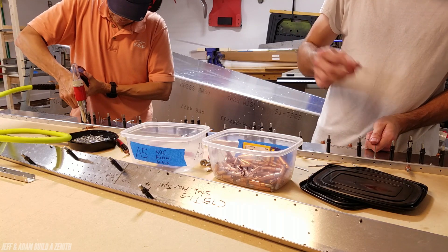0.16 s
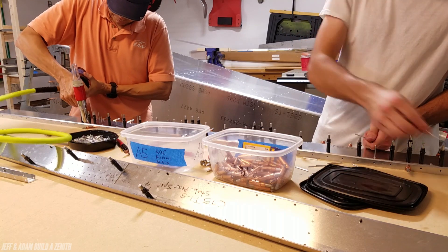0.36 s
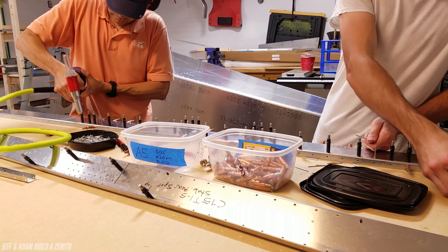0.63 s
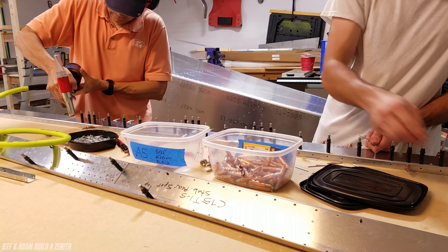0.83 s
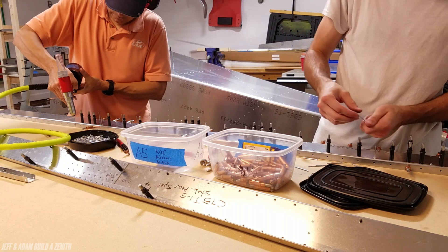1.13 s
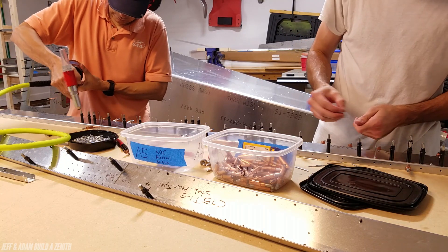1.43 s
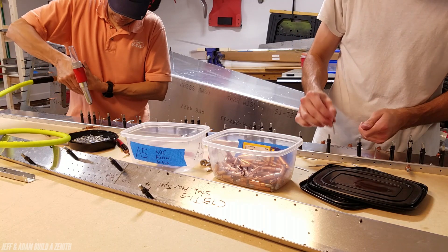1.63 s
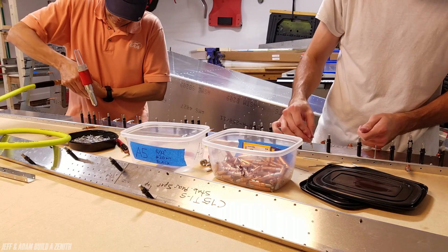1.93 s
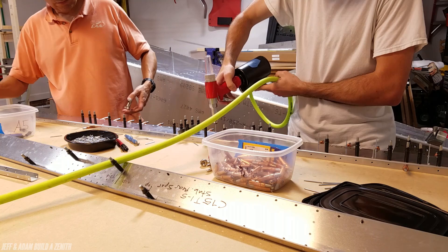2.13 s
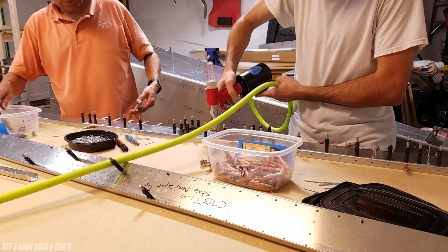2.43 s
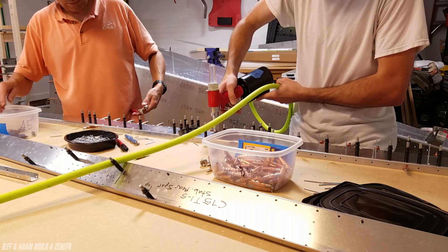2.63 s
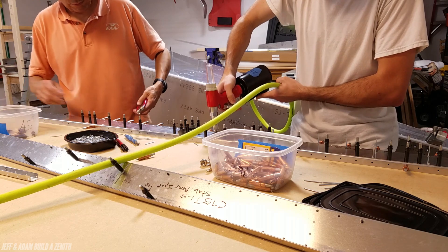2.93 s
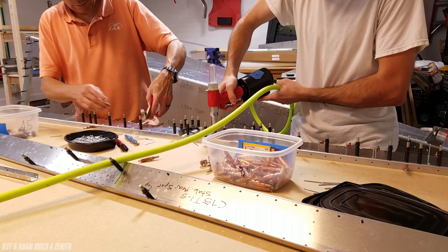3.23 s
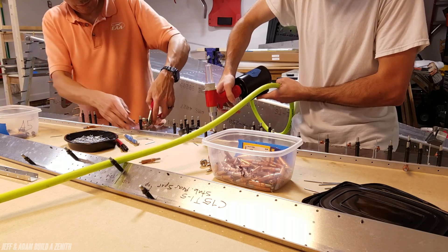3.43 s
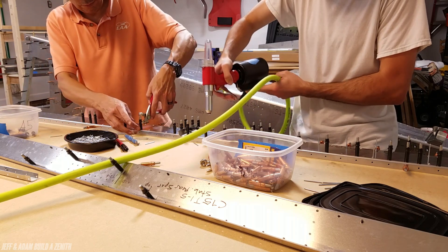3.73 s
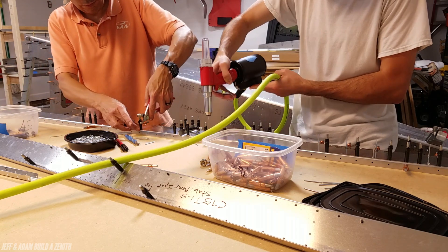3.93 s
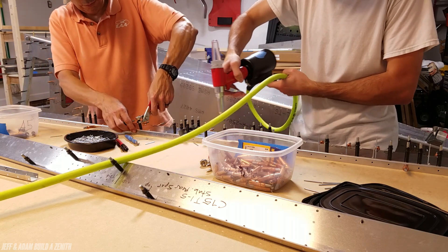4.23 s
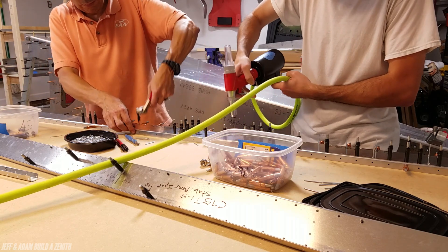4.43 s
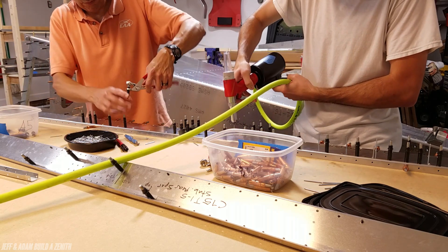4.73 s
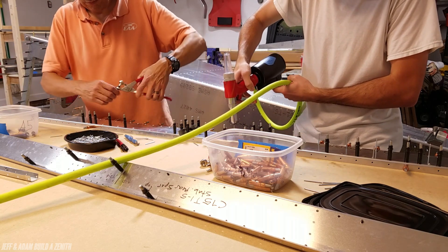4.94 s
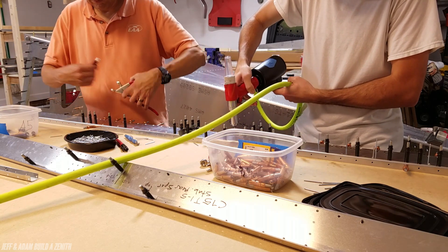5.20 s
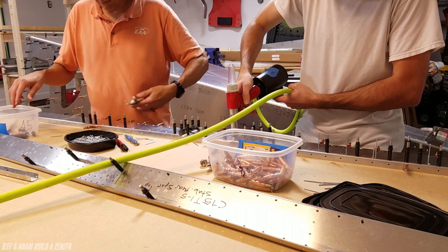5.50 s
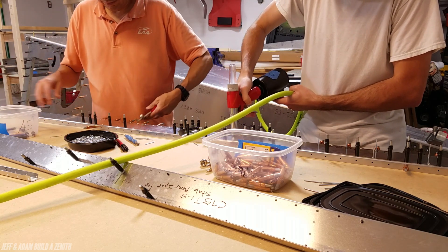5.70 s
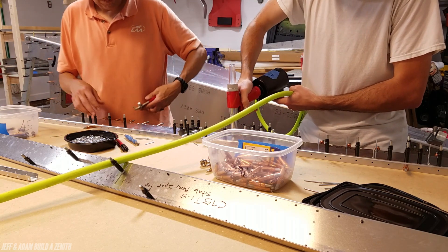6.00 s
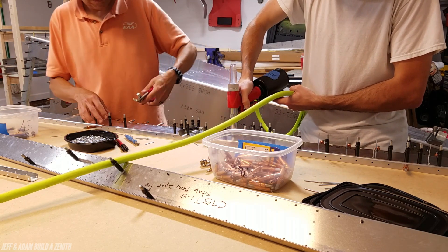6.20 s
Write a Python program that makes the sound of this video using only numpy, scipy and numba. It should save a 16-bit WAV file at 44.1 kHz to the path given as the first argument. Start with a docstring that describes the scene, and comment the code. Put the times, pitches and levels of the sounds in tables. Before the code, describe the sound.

Close, nearly mono workshop sound over a soft fan drone. Three rivets are set about three seconds apart, each with a dull piston thump, a loud crack ringing thin sheet metal, and a bright burst of escaping air. Between them hands click pliers, set down tools, drag things briefly and chink loose fasteners; the hardest clatter comes just before the second shot. Walls add a short reverberant tail.

```python
"""In a hard-walled workshop a fan hums while air-powered rivet guns set three blind rivets on a bench. Hands
set down and drag tools and fasteners: decaying rings with noisy rattles, rubbing noise, chinks. A brief faint
burst of treble sounds near 2.12 s. Each shot: the piston thuds and air rushes in, the mandrel snaps and rings
the sheet metal as a crowd of modes, the exhaust blows down as shaped noise, and the suction ends in a breathy
whistle. One microphone hears it with the walls' tail; gain control ducks a little under the loudest blows."""
import sys
import numpy as np
from scipy import signal
from scipy.fft import rfft, irfft
from scipy.io import wavfile
from scipy.ndimage import uniform_filter1d
from numba import njit

SR = 44100
rng = np.random.default_rng(int(sys.argv[2]) if len(sys.argv) > 2 else 0)


def how_loud(loudness_db):
    """Turn decibels into a plain amplitude multiplier (0 dB gives 1, 20 dB gives 10)."""
    steps = np.asarray(loudness_db, float) / 20
    return 10 ** steps


def waveform_to_disk(signal):
    """Save audio, clipped to [-1, 1], as 16-bit WAV at the path in sys.argv[1]."""
    frames = np.transpose(np.atleast_2d(signal))
    scaled = np.clip(frames, -1, 1) * 32767
    samples = np.round(scaled).astype(np.int16)
    wavfile.write(sys.argv[1], SR, samples)


N = 280474
TIME = np.arange(N) / SR  # seconds

# spectrum of bright metallic jingling: freq_hz, relative density_db (per Hz)
BRIGHT_METAL = [(5000, -36), (9000, -29), (11000, -17.5), (13000, -11), (15700, -12.5)]
# spectrum of things rattling or rubbing on the bench: freq_hz, relative density_db (per Hz)
BENCH_RATTLE = [(30, -1), (90, 4), (250, 3.5), (750, 6.5), (1400, 2.5), (3000, -9.5), (5000, -21.5),
                (8000, -38)]


def colour(x, points):
    """Filter by (Hz, dB) points joined on a log axis, without looking ahead (minimum phase)."""
    hz, db = np.transpose(points)
    grid_hz = np.maximum(np.fft.rfftfreq(4096, 1 / SR), 1)
    level_db = np.interp(np.log(grid_hz), np.log(hz), np.maximum(db, -80))
    cepstrum = irfft(level_db * np.log(10) / 20)
    # folding the cepstrum forward makes the response causal
    cepstrum[1:2048] *= 2
    cepstrum[2049:] = 0
    response = irfft(np.exp(rfft(cepstrum)))
    return signal.fftconvolve(x, response)[:len(x)]


def hiss(points):
    """Coloured noise of rms 1."""
    x = colour(rng.standard_normal(N), points)
    return x / x.std()


def walk(rate, size=N):
    """Random levels held 1 / rate s and slewed twice; spread near 1."""
    k = int(SR / rate)
    held = np.repeat(rng.standard_normal(size // k + 1), k)
    return 1.3 * uniform_filter1d(uniform_filter1d(held, k), k)[:size]


def swell(start, rise_s, fall_db):
    """Envelope: silent, a quick rise, then a fall of fall_db a second."""
    t = np.maximum(TIME - start, 0)
    return (1 - np.exp(-t / rise_s)) * how_loud(-fall_db * t)


def add(out, start, x):
    """Mix x in at start seconds."""
    i = int(start * SR)
    out[..., i:i + x.shape[-1]] += x[..., :N - i]


def peak(x):
    """Scale the loudest few milliseconds to a peak near 1, judged by their mean power."""
    return x / np.sqrt(2 * np.max(uniform_filter1d(x ** 2, size=130)))


def shop():
    """Fan noise that drifts a little, under tones that waver in pitch and level."""
    # fan noise spectrum: freq_hz, relative density_db (per Hz)
    fan_spectrum = [(25, -4), (65, 7), (100, -4.5), (130, -6), (200, 4.5), (400, -2.5), (700, -2.5),
                    (1400, -4.5), (2200, -8), (3500, -17), (5500, -28.5), (8000, -45), (12500, -48),
                    (16000, -45)]
    # fan tones: freq_hz, mean level_db, slow waver_db
    fan_tones = [(196.3, -42, .8), (262, -57, 2), (526, -56, 3.5), (788, -61, 3)]
    out = how_loud(-42 + .6 * walk(2)) * hiss(fan_spectrum)
    for hz, db, waver_db in fan_tones:
        phase = 2 * np.pi * np.cumsum(hz * (1 + 0.00314 * walk(2.5))) / SR
        level = how_loud(db + waver_db * walk(3) + 1.2 * walk(25))
        out = out + level * np.sqrt(2) * np.sin(phase)
    return out


def room(x):
    """Diffuse tail of the walls: octave bands of noise, each with its own decay."""
    # decay of the hard-walled shop: freq_hz, t60_s
    wall_decay = [(100, 0.77), (500, 0.76), (2000, 1), (6000, 0.81), (14000, 0.11)]
    t = np.arange(SR) / SR
    hz, t60 = np.transpose(wall_decay)
    tail = 0
    for centre in 62.5 * 2 ** np.arange(9):
        edges_hz = [centre / 2 ** .5, min(centre * 2 ** .5, .45 * SR)]
        band = signal.butter(2, edges_hz, "bandpass", fs=SR, output="sos")
        decay_s = np.interp(np.log(centre), np.log(hz), t60)
        tail = tail + signal.sosfilt(band, rng.standard_normal(SR)) * how_loud(-60 * t / decay_s)
    tail = tail * (1 - np.exp(-t / 0.0026))  # the tail builds up over a few ms
    return signal.fftconvolve(x, tail / np.sqrt(np.sum(tail ** 2)))[:N]


def scrapes():
    """Things dragged or shifted on the bench: unsteady rubbing noise with a trace of bright hiss."""
    # drags: start_s, nominal level_db, length_ms
    drags = [(2.47, -29.5, 78), (3.64, -30.5, 31), (3.664, -30.5, 66), (3.79, -32.5, 64),
             (5.298, -34.5, 54), (5.36, -36, 83), (5.455, -24.5, 33), (5.625, -38, 55), (5.69, -30, 76)]
    rub = hiss(BENCH_RATTLE) * how_loud(0.87 * walk(120)) + how_loud(-22.5) * hiss(BRIGHT_METAL)
    out = np.zeros(N)
    for start, db, length_ms in drags:
        progress = np.clip((TIME - start) * 1000 / length_ms, 0, 1)
        out += how_loud(db) * np.sin(np.pi * progress ** 0.48) * rub
    return out


def loose_pin():
    """A loose pin sings on thinly after a hard knock: one high sine, unsteady in pitch."""
    seconds = np.cumsum(1 + 0.0037 * walk(150)) / SR
    return how_loud(-52) * np.sin(2 * np.pi * 12080 * seconds) * swell(2.39, .01, 130)


def chink(db):
    """A burst of bright noise: a tick, then a fainter shimmer that dies more slowly."""
    tick_s, shimmer_s, shimmer_db = 0.0013, 0.055, -15.5
    t = np.arange(int(.2 * SR)) / SR
    tick = np.exp(-t / tick_s)
    shimmer = how_loud(shimmer_db) * np.exp(-t / shimmer_s) * (1 - tick)
    noise = rng.standard_normal(len(t))
    return how_loud(db) * peak(colour(noise * (tick + shimmer), BRIGHT_METAL))


def chinks():
    """Short bright metallic chinks from the bench, and a brief faint burst of treble near 2.12 s; all are
    bursts of bright noise."""
    # bright bursts: start_s, peak_db
    bursts = [(1.338, -41), (1.3459, -44), (2.1191, -44), (2.3136, -50), (2.382, -52), (2.4079, -34),
              (2.434, -28.5), (2.7107, -55), (3.0026, -52.5), (4.0796, -54), (4.0916, -49), (4.1834, -54),
              (4.2373, -51), (4.3505, -38), (4.8035, -45.5), (5.3103, -53), (5.4011, -54), (5.447, -33),
              (5.4595, -29), (5.6291, -40), (5.6634, -40), (5.676, -33)]
    out = np.zeros(N)
    for start, db in bursts:
        add(out, start, chink(db))
    return out


def tap(db, hz, rattle_ms, thump_db, cycles, struck):
    """One contact: a few cycles of the struck thing and a broad rattle, as two rows."""
    t = np.arange(int(.2 * SR)) / SR
    turns = hz * t
    ring = np.sin(2 * np.pi * turns) * turns / cycles * np.exp(1 - turns / cycles)
    shape = np.exp(-t * 1000 / rattle_ms) * (1 - np.exp(-t * 3000 / rattle_ms))
    rattle = colour(rng.standard_normal(len(t)) * shape, struck)
    return how_loud(db) * np.array([peak(ring), how_loud(thump_db) * peak(rattle)])


def clicks():
    """Small close metal clicks of pliers and clamps: short high taps."""
    # clicks: start_s, peak_db, ring_hz, rattle_db (against ring)
    click_rows = [(1.05, -28, 3580, 0), (1.14, -29, 2500, -2), (1.1435, -32, 2430, 4),
                  (1.3367, -27, 2510, 3), (1.4068, -32, 2450, 3), (1.4463, -36, 2400, 3),
                  (2.3985, -11, 2230, -21), (2.4363, -14.5, 2830, -8), (3.854, -23.5, 2880, -6),
                  (3.965, -18, 2080, 1), (4.08, -27, 2850, 8), (4.092, -28.5, 2550, 7),
                  (4.104, -31, 2330, -1), (4.186, -29.5, 2520, 9), (4.237, -33.5, 2720, 4),
                  (4.358, -22, 2660, 0)]
    # rattle of small metal: freq_hz, relative density_db (per Hz)
    small_metal = [(400, -26), (1500, 9), (2200, 14), (4200, -2), (6000, -23), (9000, -48)]
    out = np.zeros(N)
    for start, db, hz, thump_db in click_rows:
        contact = tap(0, hz, rattle_ms=1.6, thump_db=thump_db, cycles=2.66, struck=small_metal)
        add(out, start, how_loud(db) * peak(contact.sum(axis=0)))
    return out


def knocks():
    """Tools and tubs set down: three contacts each, unevenly spaced, as rows of rings and rattles."""
    # knocks: start_s, ring peak_db, ring_hz, bounce_loss_db, rattle_db (against ring)
    set_downs = [(2.16, -24.5, 314, 3.5, -5), (2.249, -27.5, 594, 8, -2), (2.269, -18.5, 600, 6, -16),
                 (2.325, -28, 595, 4, -6), (2.353, -27.5, 560, 10, -10), (2.383, -13.5, 556, 16, -7),
                 (2.402, -21, 573, 6, 1), (2.429, -19, 720, 21, -1), (2.4375, -6.5, 586, 7.5, -5),
                 (3.013, -30, 563, 10, -1), (3.506, -21, 755, 8.5, -4.5), (4.33, -18.5, 557, 1.5, -2),
                 (4.984, -33, 586, 15, -4), (5.305, -28, 683, 3, -8), (5.443, -21, 584, 1.5, 3.5),
                 (5.468, -25.5, 806, 1, 1), (5.511, -21.5, 720, 4.5, -1.5), (5.67, -15, 716, 5, 0.5)]
    bounce_s = .012  # mean spacing
    out = np.zeros((2, N))
    for first, db, hz, loss_db, thump_db in set_downs:
        uneven = rng.uniform(-1, 1, (3, 2))
        for bounce, (late, detune) in enumerate(uneven):
            start = first + bounce * bounce_s * (1 + 0.1514 * late)
            bounce_db = db - bounce * abs(loss_db)
            bounce_hz = hz * (1 + 0.11 * detune * min(bounce, 1))  # the first contact keeps its pitch
            add(out, start, tap(bounce_db, bounce_hz, rattle_ms=7.6, thump_db=thump_db,
                                cycles=1.27, struck=BENCH_RATTLE))
    return out


def handling():
    """Hands at the bench, plus a brief faint treble burst near 2.12 s: returns rings, then rattles with chinks,
    that burst, rubbing and pin, then clicks."""
    rings, rattles = knocks()
    return rings, rattles + chinks() + scrapes() + loose_pin(), clicks()


def sheet():
    """One blow on the sheet and gun body: every crowd of close modes beats roughly as it dies."""
    # crowds of modes: centre_hz, half_width_hz, relative level_db, middle t60_s
    crowds = [(128, 67, -3, 0.11), (262, 120, -5, 0.18), (483, 110, -15, 0.167), (680, 141, -2.5, 0.15),
              (930, 200, -1.5, 0.16), (1270, 240, 1.5, 0.23), (1460, 220, -1.5, 0.26), (1916, 500, -8, 0.1),
              (2460, 200, -8, 0.3), (2850, 300, -13, .1), (4400, 2000, -11.5, 0.12)]
    t = np.arange(int(.4 * SR)) / SR
    out = 0
    for hz, width_hz, db, t60 in crowds:
        count = 16 + int(width_hz) // 16
        place, size, phase, loss = rng.uniform(-1, 1, (4, count, 1))
        mode_hz = hz + width_hz * place * np.abs(place) ** 0.412
        decay = how_loud(2.7 * size - 60 * t * (1 + 0.27 * loss) / t60)
        modes = decay * np.sin(2 * np.pi * (mode_hz * t + phase))
        flutter = how_loud(db + 2.5 * walk(100, size=len(t)))
        out = out + flutter * modes.sum(axis=0) / np.sqrt(count)
    return out * (1 - np.exp(-t / .005))


def crack():
    """The mandrel breaks: brief noise over a gun-body knock, then the stem jingles in its catcher."""
    # breaking metal: freq_hz, relative density_db (per Hz)
    break_spectrum = [(300, -3), (1300, 5), (2900, -4), (4300, -3.5), (7000, -20.5), (10000, -31),
                      (13500, -8.5), (15700, -18)]
    t = np.arange(int(.2 * SR)) / SR
    burst, shake = rng.standard_normal((2, len(t)))
    burst = colour(burst * t / .0012 * np.exp(1 - t / .0012), break_spectrum)
    knock = np.sin(2 * np.pi * 1280 * t) + .4 * np.sin(2 * np.pi * 2880 * t)
    knock = knock * t / .0011 * np.exp(1 - t / .0011)
    stem = colour(shake, BRIGHT_METAL) * np.exp(-t / 0.062)
    return how_loud(-10.5) * burst / np.abs(burst).max() + how_loud(-5) * knock + how_loud(-17.0) * stem


def drawn_air(suction):
    """Suction hiss with an added narrow band of noise near 13 kHz that wanders in pitch."""
    phase = 2 * np.pi * np.cumsum(13000 * (1 + .04 * walk(4))) / SR
    edge = uniform_filter1d(rng.standard_normal(N), size=40) * np.sin(phase)
    return suction + how_loud(-9.5) * edge / edge.std()


def gun():
    """Valve and piston strokes in order; returns the solid blows and the air."""
    # one row a rivet: trigger_s, snap_s, exhaust_opens_s
    shots = [(.2325, .3145, .459), (3.037, 3.1065, 3.258), (6.083, 6.1632, 6.268)]
    # strokes of each rivet: piston_thud_db, exhaust_db, suction_db
    stroke_levels = [(-11.5, -12, -49), (-18.5, -15, -46.5), (-18.5, -16.5, -41)]
    # spectra, each freq_hz, relative density_db (per Hz): piston rumble, exhaust, suction,
    # breathy whistle of the suction nozzle, piston against its stop
    thud = hiss([(35, -15), (60, 3), (174, 5.5), (403, -6), (570, 4), (859, -4), (1190, 0), (1650, -11),
                 (2440, -11), (8000, -65.5), (10400, -53), (17600, -120)])
    jet = hiss([(290, -24.5), (500, -6.5), (1280, -6.5), (2210, -3.5), (4880, -8), (9340, -18.5),
                (12600, -5), (15700, -4.5)])
    suction = hiss([(1760, -26), (3000, -2.5), (4510, -8), (5480, -15), (6430, -17.5), (8080, -24),
                    (10500, -23.5), (12400, -9.5), (15700, -16.5)])
    whistle = hiss([(3400, -30), (3780, 0), (4150, -30)])
    stop = hiss([(60, -24.5), (200, -3), (500, -1.5), (900, -2), (1400, 0.5), (2800, -11), (8000, -48)])
    valve_s, recoil_s, suction_s = .004, 0.016, .596
    blows, air = np.zeros(N), np.zeros(N)
    drawn = drawn_air(suction)
    for (pull, snap, vent), (thud_db, out_db, suck_db) in zip(shots, stroke_levels):
        shut = vent + suction_s  # suction stays on this long after the exhaust opens
        # the piston travels about 30 ms, rumbling, then loads the rivet
        loaded = how_loud(-900 * np.maximum(TIME - pull - .032, 0))
        blows += how_loud(thud_db) * thud * swell(pull, valve_s, 70) * loaded
        # the gun's nose shakes the sheet as the piston starts
        add(blows, pull, how_loud(thud_db - 13) * sheet())
        add(blows, snap, how_loud(-12) * sheet())
        add(blows, snap, how_loud(3.5) * crack())
        # the freed piston slams back into its stop
        blows += how_loud(thud_db + 6.5) * stop * swell(snap + recoil_s, 0.0053, 330.0)
        # air rushes in until just before the exhaust opens
        closing = np.clip((vent - .008 - TIME) / 0.029, 0, 1)
        air += how_loud(-34) * suction * swell(pull - .006, 0.0066, 31) * closing
        # the cylinder holds its flow a moment, then empties faster
        emptying = how_loud(-160 * np.maximum(TIME - vent, 0) ** 2)
        air += how_loud(out_db) * jet * swell(vent, 0.0095, 67) * emptying
        air += how_loud(suck_db) * drawn * (TIME > vent) * how_loud(-400 * np.maximum(TIME - shut, 0))
        # the nozzle whistles as the flow thins out, and a little after
        air += how_loud(suck_db - 2) * whistle * swell(shut - .03, 0.035, 90)
    return blows, air * how_loud(0.84 * walk(30))


def scene():
    """Everything reaches one microphone; only the treble differs a little between the channels."""
    blows, air = gun()
    rings, rattles, small_clicks = handling()
    # each source excites the walls by its own amount
    solid_send = how_loud(-7.5) * blows + how_loud(-10.0) * rings + how_loud(-7.0) * rattles
    wet = room(solid_send + how_loud(-5.0) * air + how_loud(-17.5) * small_clicks)
    mid = blows + air + rings + rattles + small_clicks + wet + shop()
    treble = [(1500, -40), (3000, -20), (6000, -12), (9000, -4), (13000, 0)]
    side = how_loud(-21) * colour(np.roll(mid, 40), treble)
    return np.array([mid + side, mid - side])


@njit
def follow(x, attack, release):
    """Envelope that rises fast and falls slowly."""
    e, out = 1e-6, np.empty(len(x))
    for i in range(len(x)):
        e += (x[i] - e) * (attack if x[i] > e else release)
        out[i] = e
    return out


def top_cut(x):
    """Nothing passes above the cut-off."""
    return signal.sosfilt(signal.butter(12, 16740, fs=SR, output="sos"), x)


def record(dry):
    """Microphone cuts, gain control that turns loud moments down, a clipping converter."""
    # microphone's low and high cut: freq_hz, gain_db
    mic_cuts = [(30, -12), (80, -15), (110, 0), (15700, 0), (15900, -30), (17000, -60)]
    attack_s, release_s, threshold_db = 0.00288, .1, -19.0
    heard = np.array([colour(x, mic_cuts) for x in dry])
    envelope = follow(np.abs(heard).max(axis=0), 1 / (attack_s * SR), 1 / (release_s * SR))
    gain = np.minimum(1, how_loud(threshold_db) / envelope) ** 0.097  # a gentle ratio
    mix = np.clip(heard * gain, -1, 1)
    return top_cut(mix)


dry = scene()
out = record(dry)
waveform_to_disk(out)
```